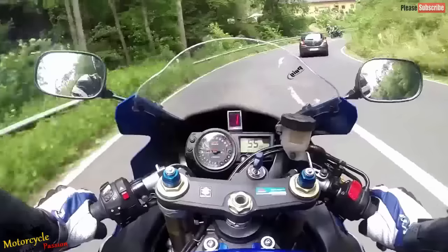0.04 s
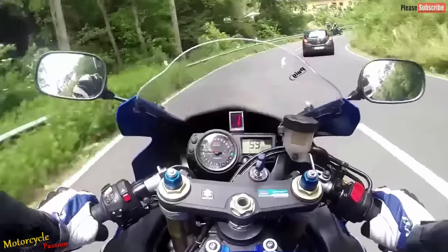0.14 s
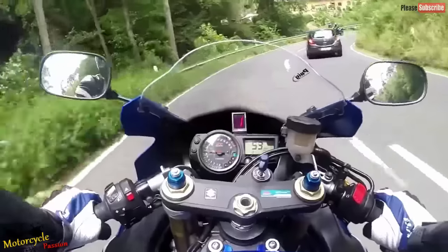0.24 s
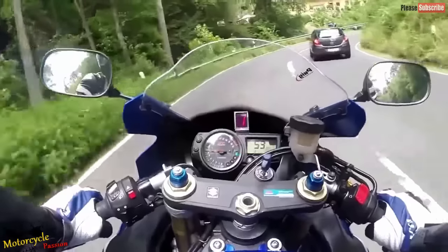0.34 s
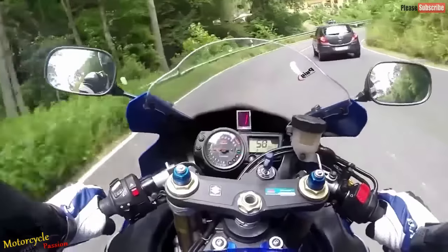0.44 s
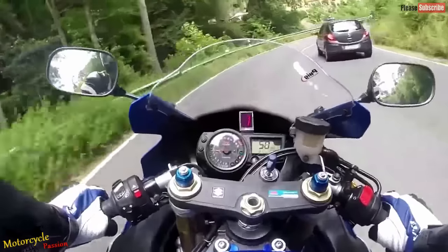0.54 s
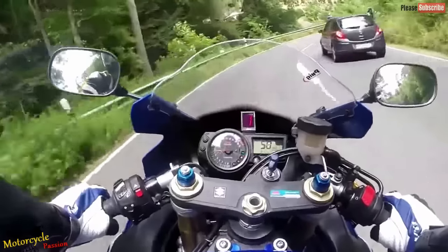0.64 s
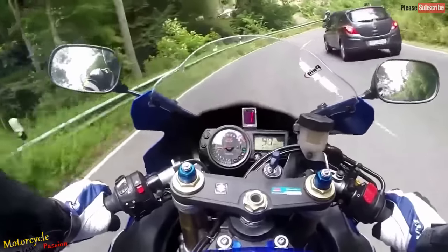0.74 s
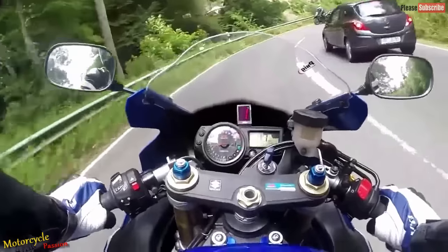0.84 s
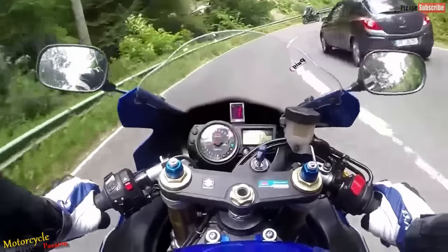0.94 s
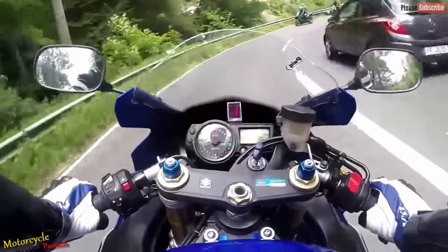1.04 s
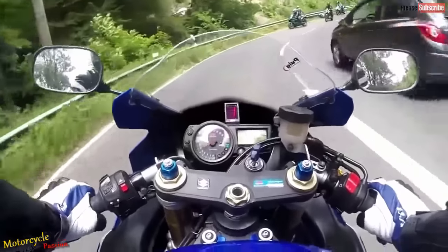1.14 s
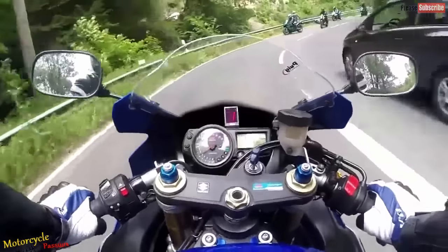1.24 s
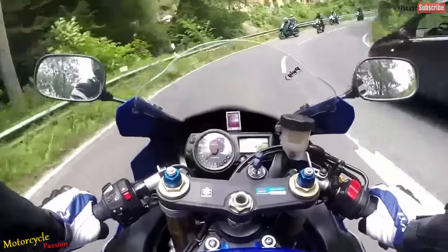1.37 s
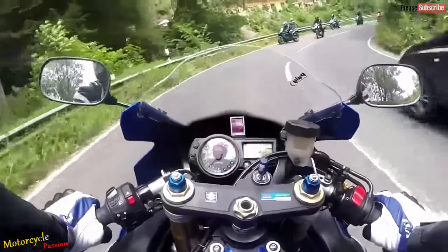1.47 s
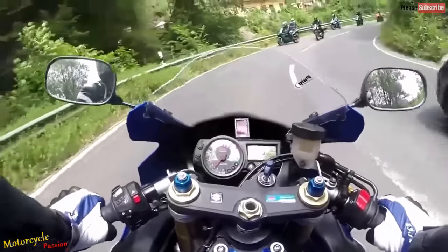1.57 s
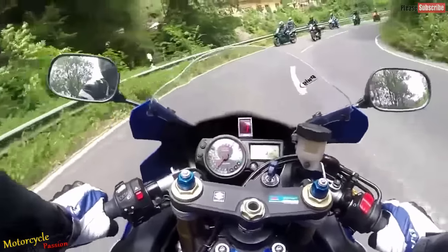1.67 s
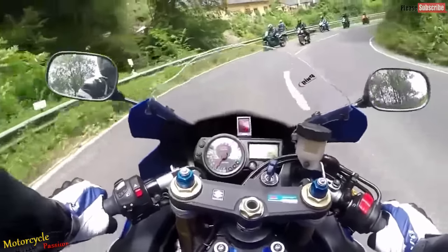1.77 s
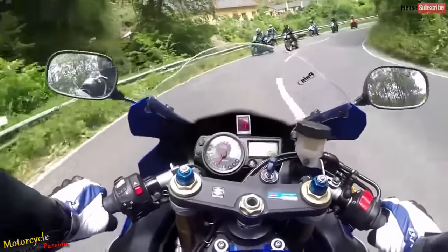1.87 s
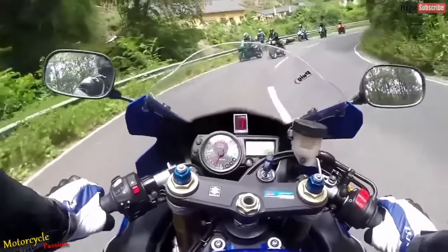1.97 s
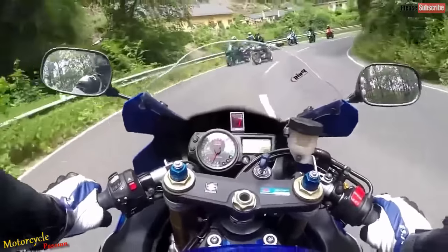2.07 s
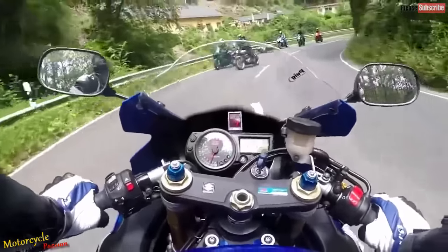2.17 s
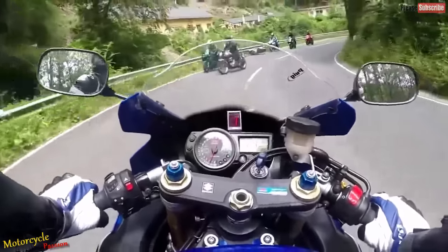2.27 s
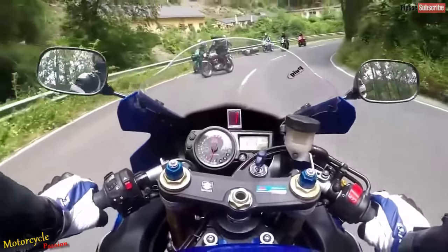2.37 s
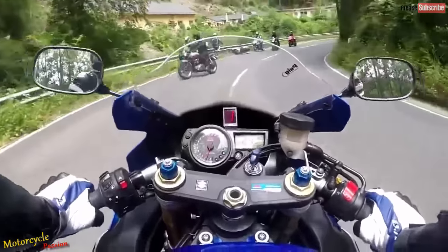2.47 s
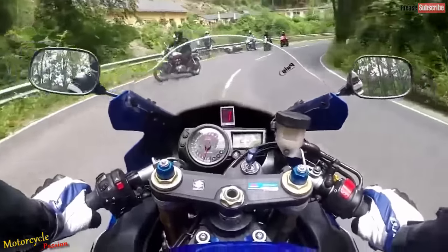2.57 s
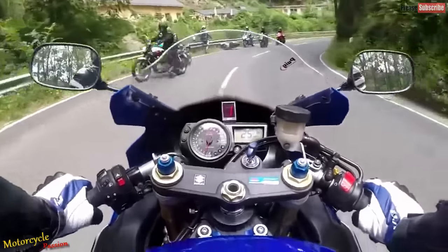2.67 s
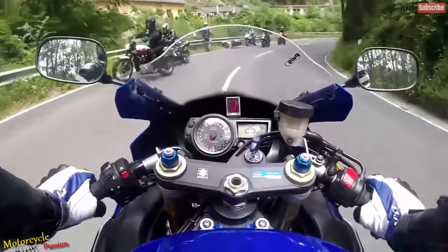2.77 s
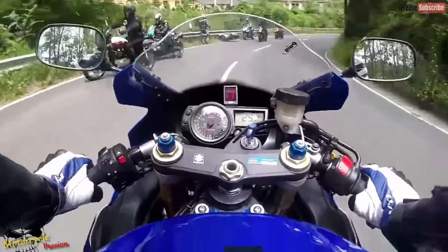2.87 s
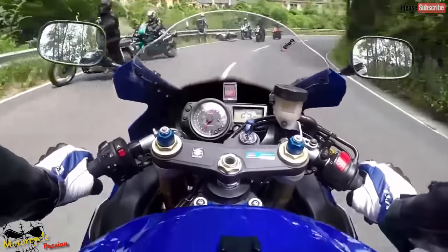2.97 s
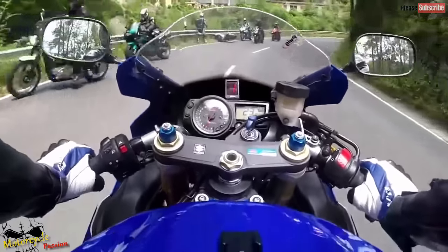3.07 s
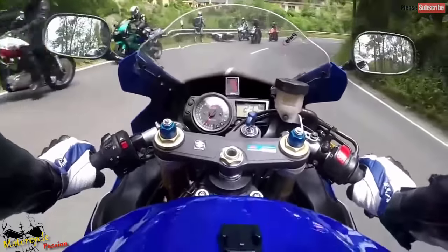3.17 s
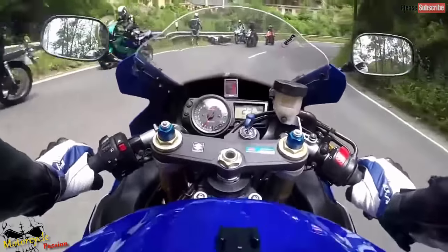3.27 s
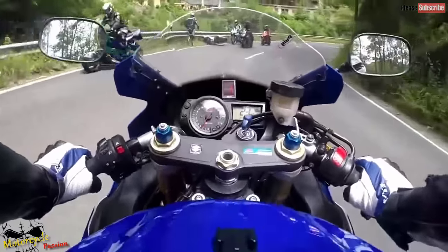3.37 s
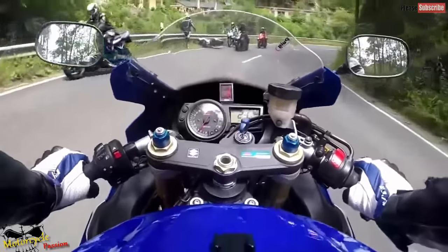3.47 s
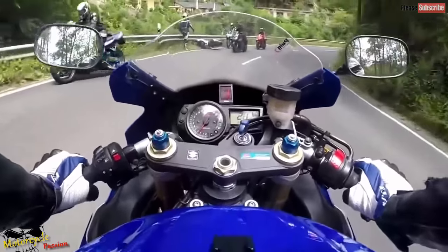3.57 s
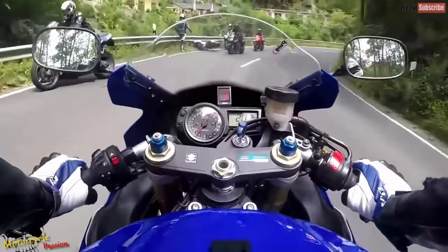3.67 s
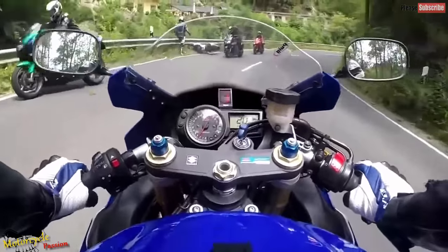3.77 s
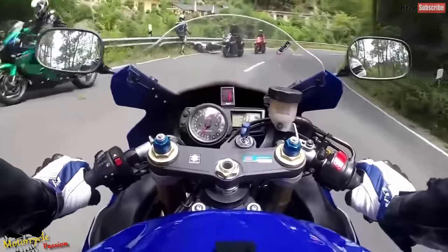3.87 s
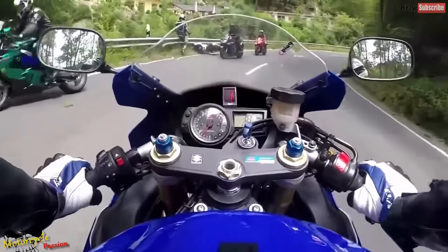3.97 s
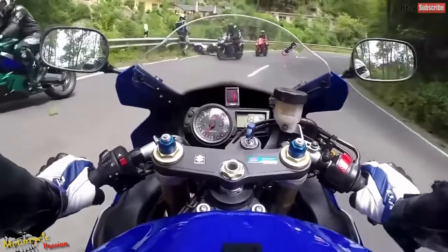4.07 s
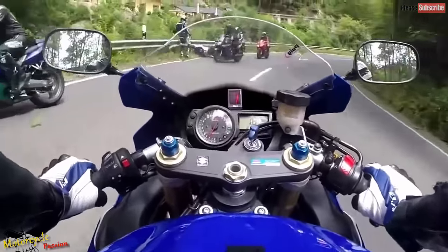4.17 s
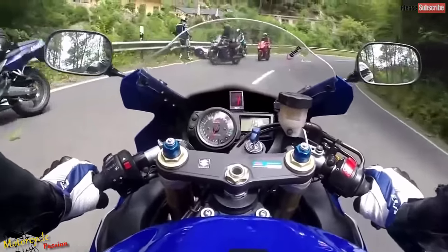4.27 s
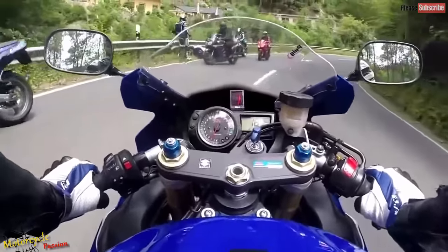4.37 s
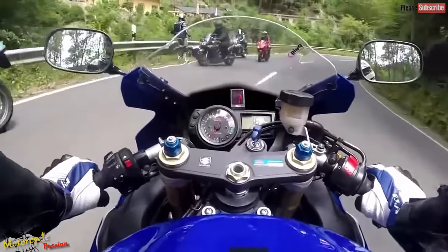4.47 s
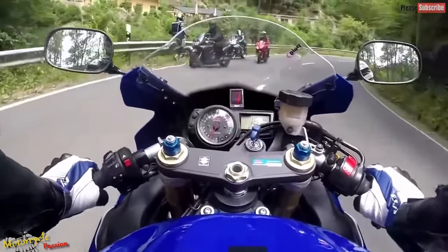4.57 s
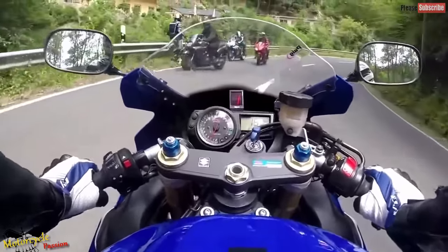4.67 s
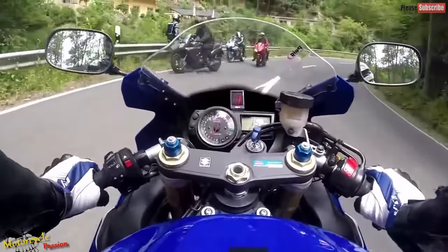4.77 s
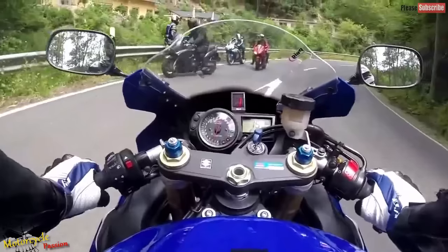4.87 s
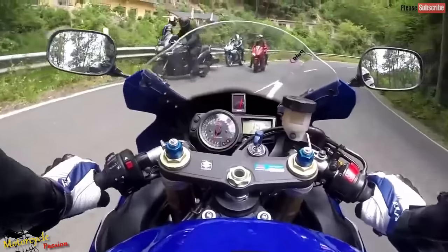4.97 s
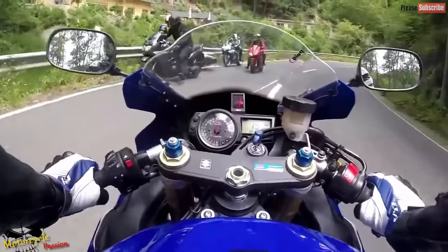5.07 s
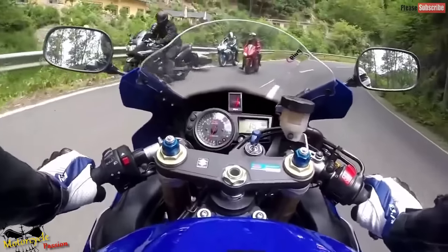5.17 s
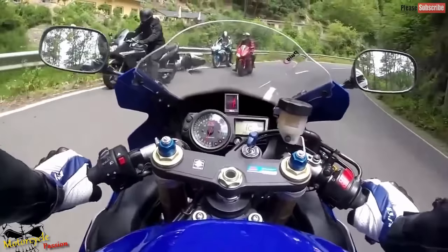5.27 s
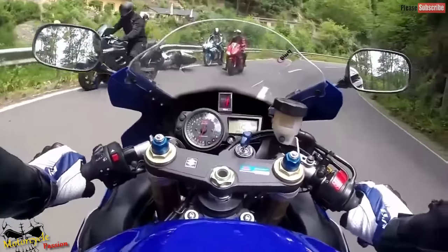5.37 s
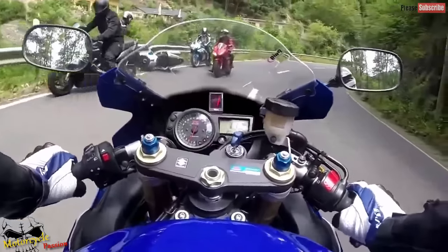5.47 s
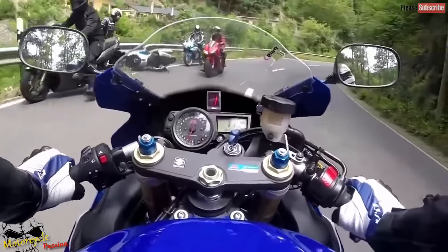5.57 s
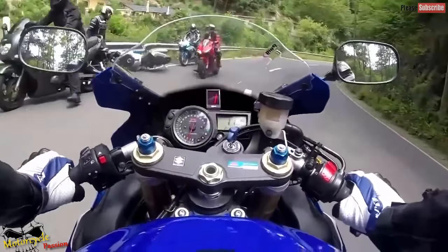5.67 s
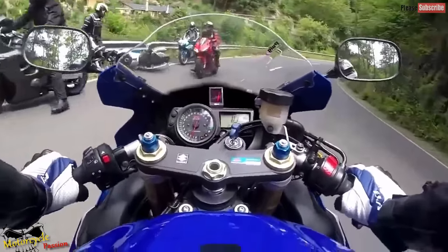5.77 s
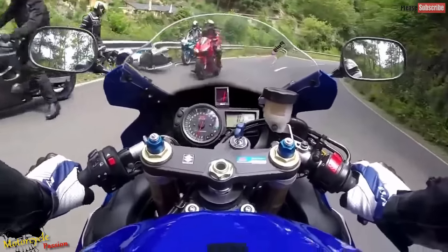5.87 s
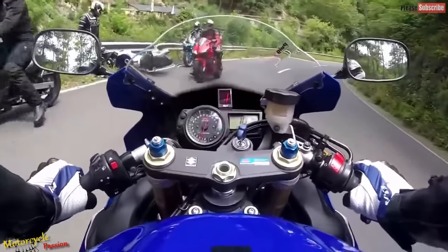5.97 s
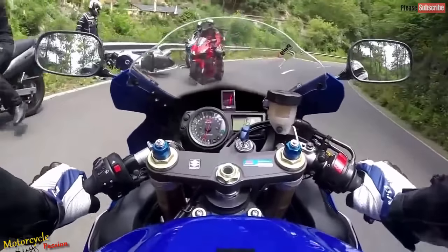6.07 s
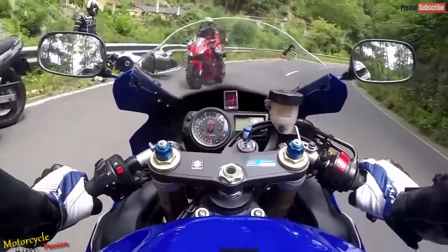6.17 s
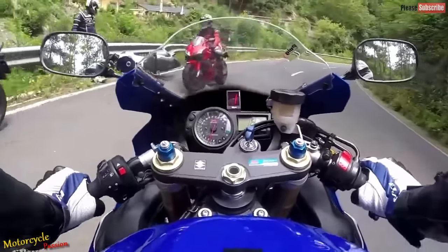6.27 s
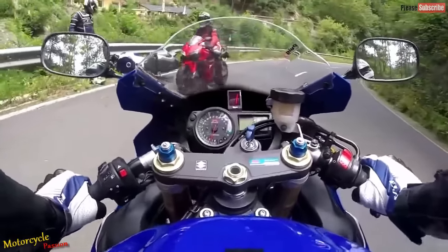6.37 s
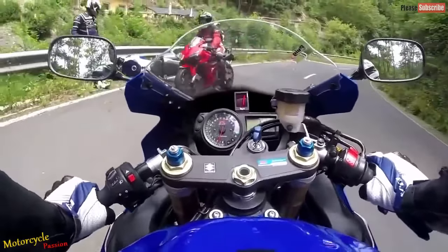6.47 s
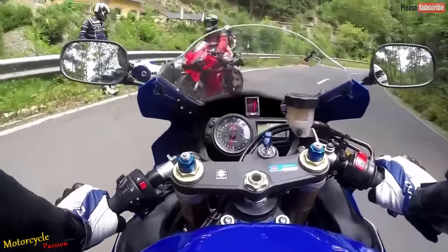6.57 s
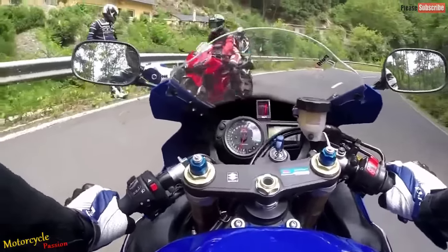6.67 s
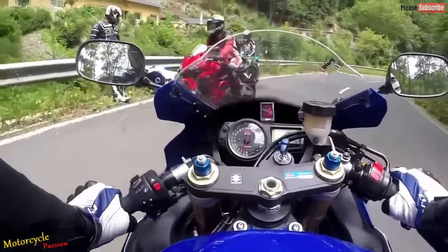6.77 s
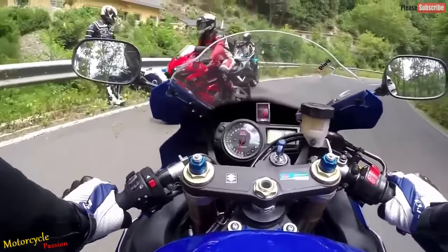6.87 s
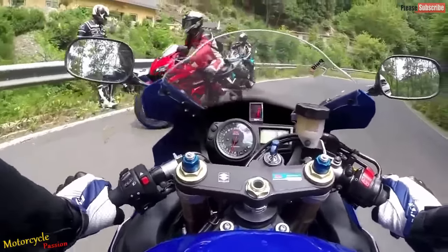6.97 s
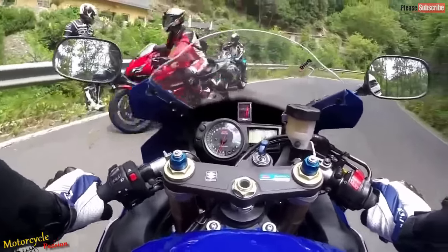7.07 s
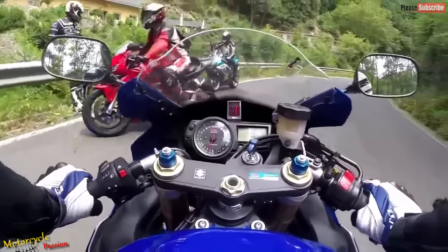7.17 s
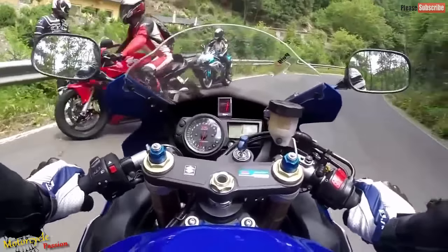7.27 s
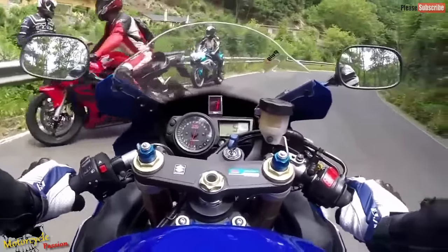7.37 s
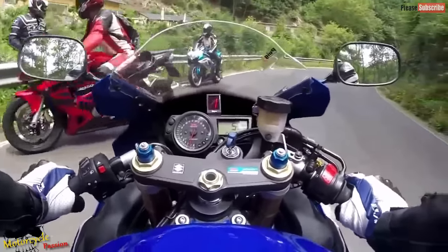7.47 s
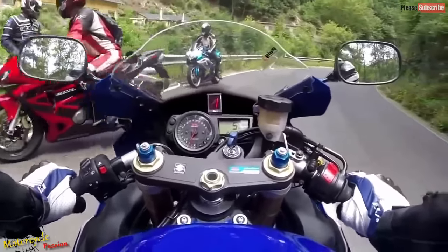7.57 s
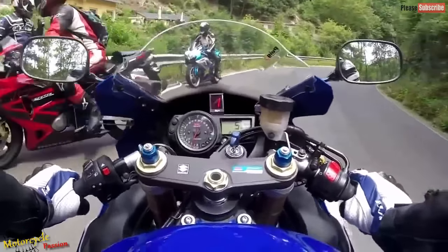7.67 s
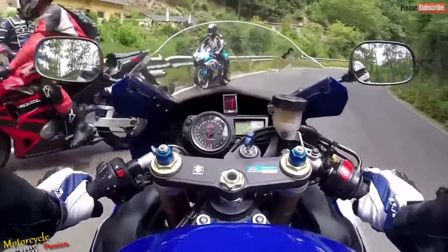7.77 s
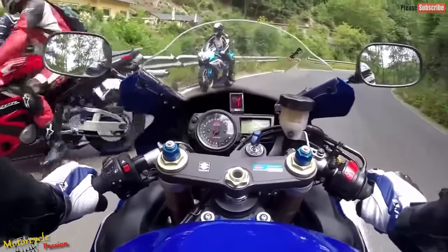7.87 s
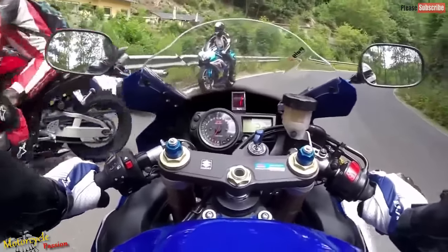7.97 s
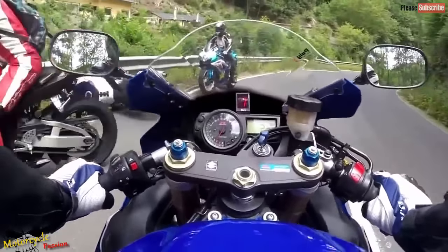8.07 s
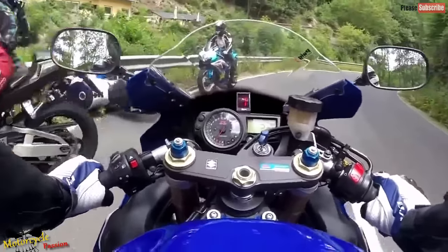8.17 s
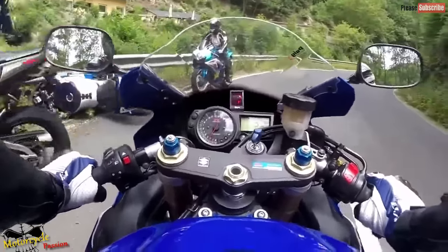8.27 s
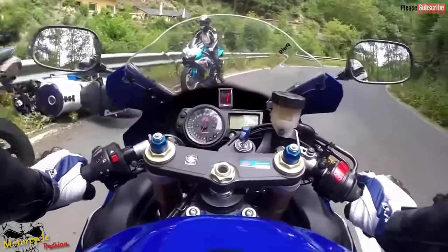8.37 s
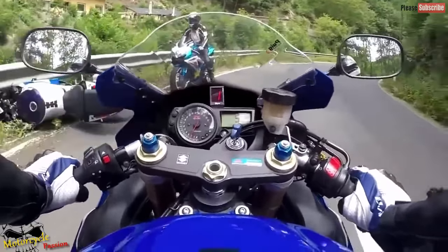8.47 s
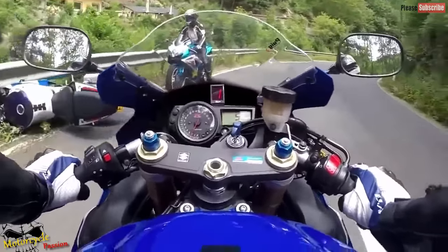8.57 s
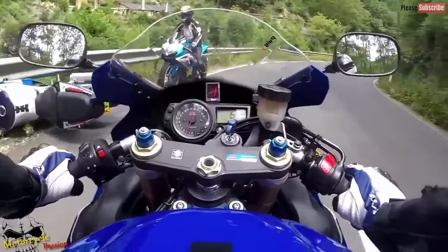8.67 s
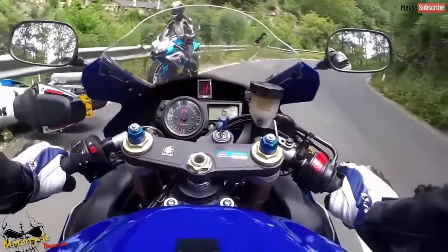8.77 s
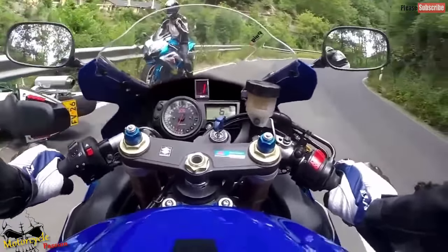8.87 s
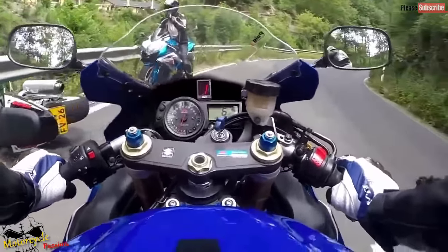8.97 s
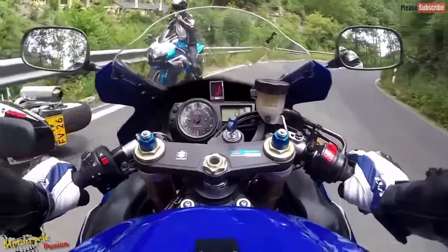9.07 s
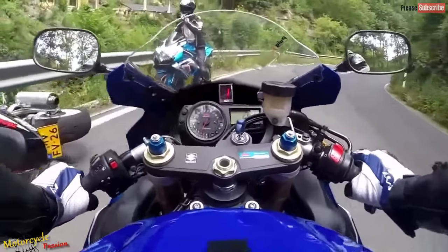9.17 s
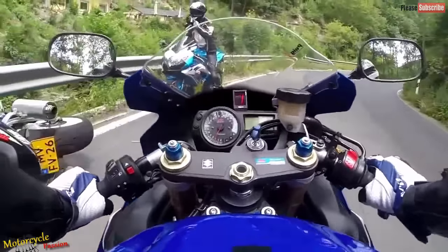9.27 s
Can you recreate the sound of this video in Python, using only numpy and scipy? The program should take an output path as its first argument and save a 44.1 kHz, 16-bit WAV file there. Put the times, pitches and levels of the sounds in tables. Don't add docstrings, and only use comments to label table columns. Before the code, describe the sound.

A motorcycle slows on an open road, its engine drone and high drivetrain whine sliding down while wind buffeting eases. At low speed a muffled hiss and uneven purr remain. The close, boxy onboard microphone picks up plastic ticks, mount thuds and latch snaps, densest in the middle and in a chattering jolt before seven seconds. The engine then revs lightly, dips and rises again.

```python
import sys
import numpy as np
from scipy import signal
from scipy.fft import rfft, irfft, next_fast_len
from scipy.io import wavfile
from scipy.ndimage import uniform_filter1d

SR = 44100
rng = np.random.default_rng(int(sys.argv[2]) if len(sys.argv) > 2 else 0)


def attenuation_scalar(level_db):
    decades = np.asarray(level_db, float) / 20
    return 10 ** decades


def dump(signal):
    limited = np.clip(np.atleast_2d(signal).T, -1, 1)
    pcm = np.round(limited * 32767).astype(np.int16)
    wavfile.write(sys.argv[1], SR, pcm)


N = 411585


def unit(x):
    return x / np.sqrt(np.mean(x ** 2) + 1e-20)


def along(points, hz):
    f, v = np.transpose(points)
    return np.interp(np.log(hz + 1), np.log(f + 1), v)


def curves(rows):
    s, *columns = np.transpose(rows)
    return [np.interp(np.arange(N) / SR, s, column) for column in columns]


def wobble(rate_hz):
    knots = rng.standard_normal(int(N * rate_hz / SR) + 4)
    return np.interp(np.arange(N) * (rate_hz / SR), np.arange(len(knots)), knots)


def coloured(x, gain):
    m = next_fast_len(N + 8192)
    return unit(irfft(rfft(x, m) * gain(np.fft.rfftfreq(m, 1 / SR)), m)[:N])


def patchy(patchy_db):
    z = signal.stft(rng.standard_normal(N), nperseg=512)[2]
    across_hz = uniform_filter1d(rng.standard_normal(z.shape), 5, 0)
    field = uniform_filter1d(across_hz, 8, 1)
    return signal.istft(z * attenuation_scalar(patchy_db * unit(field)), nperseg=512)[1][:N]


def add(track, start_s, sound):
    track[round(start_s * SR):][:len(sound)] += sound


def order_tone(turns, level_db, shake, flutter_db):
    strength = np.sqrt(2) * attenuation_scalar(level_db + flutter_db * wobble(14))
    return strength * np.sin(2 * np.pi * turns + shake * wobble(18))


def pace(hz, idle_hz, span_hz):
    return np.clip((hz - idle_hz) / span_hz, 0, 1)


# pitch_hz, level_db (rms), glide_share_per_s
FIRST_LINES = [(30.5, -27.5, -0.098), (56, -46, -0.037), (138.7, -25.5, -0.23), (285.4, -31.5, -0.36),
               (449, -45, -0.3)]
# pitch_hz, density_db
FIRST_ROAR = [(10, -6), (40, 0), (150, -15), (330, -21.5), (750, -21), (1400, -25.5), (2250, -23),
              (2400, -34), (3050, -38), (3280, -50), (3700, -43), (4060, -64), (4500, -53), (5140, -53),
              (7800, -68), (8100, -88), (8600, -71), (14000, -92)]


def first_ride():
    t = np.arange(N) / SR
    lines = 0
    for hz, db, glide in FIRST_LINES:
        turns = hz * (t + glide * t ** 2 / 2) + rng.random()
        lines += order_tone(turns, db, shake=0.25, flutter_db=0.4)
    lumps = attenuation_scalar(2.7 * wobble(46))
    roar = coloured(lumps * patchy(patchy_db=2.0), lambda f: attenuation_scalar(along(FIRST_ROAR, f)))
    return lines + attenuation_scalar(-23) * roar


# time_s, firing_rate_hz, throttle_load_db, gear_tooth_load_db
RIDE = [(0.18, 214.8, -1.5, 0), (1.0, 184.5, -0.5, -6), (1.14, 171.5, -5.5, 0), (1.57, 106.7, -6, -13),
        (2.3, 44.33, -7.5, -20), (2.77, 47.95, -6, -9), (3.2, 90, -7.5, -3), (3.42, 85.33, -2.5, -13),
        (3.81, 74.64, -4, -9), (4.6, 56.96, -10, -18), (5.7, 45.86, -4, -22), (7.27, 46.27, -9, -18),
        (7.71, 69.56, -0.5, -7), (7.89, 72.87, 0.5, -4.5), (8.1, 70.85, -1, -7.5), (8.46, 74.33, 0, -6.5),
        (8.94, 57.42, -5, -10), (9.33, 74.9, 2, -8)]


def crank():
    hz, load_db, teeth_db = curves(RIDE)
    return uniform_filter1d(hz, size=SR // 25), load_db, teeth_db


# firing_rate_hz, level_db
FIRST_ORDER = [(45, -46), (60, -36.5), (73, -37.5), (110, -42), (172, -34), (186, -32), (197, -35),
               (203, -39.5), (214, -35)]
# firing_rate_hz, level_db
SECOND_ORDER = [(46, -44.5), (58, -38.5), (73, -50.5), (110, -49), (172, -36.5), (188, -36), (203, -39),
                (208, -55)]
# firing_multiple, idle_level_db, fast_level_db
UPPER_ORDERS = [(.5, -19, -6), (1.5, -5.5, -26), (2.5, -25, -7), (3, -13.5, 3.5), (3.5, -20, -3),
                (4, 0, -6), (4.5, -20, -1), (5, -1.5, -3), (5.5, -11, -5), (6, -3, -9), (6.5, -30, -8),
                (7, -18, -12), (7.5, -28, 2), (8, -11, 5), (8.5, -17, 4), (9, -20, -5), (9.5, -35, 6),
                (10, -35, 2), (10.5, -33, -1)]


def firing_orders(hz, load_db):
    turns = np.cumsum(hz) / SR
    fast = pace(hz, idle_hz=82.0, span_hz=90)
    hunt_db = 0.5 * np.clip(-load_db / 6, 0, 1)
    clutch_s, clutch_width_s = 1.03, 0.047
    clutch_db = -16 * np.exp(-((np.arange(N) / SR - clutch_s) / clutch_width_s) ** 2)
    first_db = along(FIRST_ORDER, hz) + load_db + clutch_db + 0.45 * hunt_db * wobble(7)
    second_db = along(SECOND_ORDER, hz) + load_db + 0.22 * clutch_db + hunt_db * wobble(7)
    dip_db = 5 * np.exp(-((hz - 86) / 7) ** 2)
    upper_db = -51 - dip_db + 1.5 * load_db + hunt_db * wobble(7)
    tones = order_tone(turns, first_db - 0.7, shake=0.2, flutter_db=1.0)
    tones += order_tone(2 * turns, second_db - 0.5, shake=0.2, flutter_db=1.9)
    for multiple, idle_db, fast_db in UPPER_ORDERS:
        level_db = upper_db + idle_db + fast * (fast_db - idle_db)
        tones += order_tone(multiple * turns + rng.random(), level_db, shake=0.092, flutter_db=1.5)
    return tones


# firing_rate_hz, level_db
PUMP = [(150, -82), (172, -51), (190, -45.5), (214, -52)]


def pump(hz):
    return order_tone(3.61 * np.cumsum(hz) / SR, along(PUMP, hz), shake=0.15, flutter_db=2.0)


# firing_rate_hz, level_db
WHINE = [(45, -60), (73, -50), (95, -45.5), (140, -67)]
# time_s, level_db
TEETH_BITE = [
    (7.9, -3),
    (7.95, 3),
    (8.5, 3),
    (8.56, 0),
    (8.76, 4),
    (8.82, -30),
]
# start_s, hold_s, level_db
OVERRUNS = [
    (2.97, 0.2, -51),
    (3.2, 0.33, -54.5),
    (3.66, .11, -50),
    (3.9, .2, -56),
]


def gear_whine(hz, teeth_db):
    turns = np.cumsum(hz) / SR
    fast = pace(hz, idle_hz=82.0, span_hz=90)
    mesh = 20.5
    shut_out_db = 8 * np.clip((mesh * hz - 1450) / 450, -1, 0)
    whine_db = along(WHINE, hz) + teeth_db + shut_out_db + curves(TEETH_BITE)[0]
    attack_s, release_s, off_db = 0.15, 0.19, -66
    swells = []
    for s, hold_s, db in OVERRUNS:
        corners_s = s + np.cumsum([0, attack_s, hold_s, release_s])
        swells.append(np.interp(np.arange(N) / SR, corners_s, [off_db, db, db, off_db]))
    overtone_db = np.max(swells, axis=0) + 1.5 + 1.5 * wobble(45)
    lash = 0.009 * wobble(120)
    rough_turns = turns + lash * (0.3 + 0.65 * fast) + 0.014 * wobble(14)
    whine = order_tone(mesh * rough_turns, whine_db + 4, shake=0.4, flutter_db=1.2)
    return whine + order_tone(2 * mesh * (turns + 0.75 * lash), overtone_db, shake=1.1, flutter_db=1.2)


# time_s, pitch_hz, level_db
DRIVE = [
    (.18, 4290, -43),
    (.7, 4150, -43),
    (1.08, 3770, -45),
    (1.3, 3290, -46),
    (1.5, 2880, -47),
    (1.62, 2750, -52),
    (1.75, 2650, -75),
]


def final_drive():
    hz, level_db = curves(DRIVE)
    turns = np.cumsum(hz) / SR + 0.22 * wobble(150)
    return order_tone(turns, level_db - 2 + 1.8 * wobble(30), shake=0.8, flutter_db=1.3)


def valve_taps(hz):
    cycle = np.cumsum(hz) / SR / 4
    place, size = rng.random(10) / 2, rng.standard_normal(10)
    place = np.append(place, place + 0.5)
    size = np.append(size, size + 0.55 * rng.standard_normal(10))
    at = np.interp(np.arange(int(cycle[-1]))[:, None] + place, cycle, np.arange(N))
    size = size * attenuation_scalar(rng.standard_normal(at.shape)) / np.sqrt(hz[at.astype(int)])
    return unit(np.bincount(np.round(at).astype(int).ravel(), size.ravel(), N))


# pitch_hz, width_hz, level_db
CAVITY = [(2010, 38, -6), (2500, 80, -6.5), (2967, 42, -1), (3820, 25, 0.5), (4836, 46, 0.5),
          (5544, 130, 2.5), (5770, 36, 1), (6620, 83, -1.5), (8300, 83, -23)]
# pitch_hz, density_db
SLOW_HISS = [(590, -13.5), (1000, -17.5), (1290, -8), (1990, 0.5), (2150, -3), (2470, -3.5), (3480, -8),
             (3810, -7.5), (5130, -14), (5620, -14), (6680, -16.5), (8390, -29), (14500, -38.5),
             (15400, -43)]
# pitch_hz, density_db
FAST_HISS = [(590, -13), (1000, -16.5), (1320, -11.5), (1650, -3.5), (1920, -3.5), (2710, -4), (4230, -7.5),
             (5190, -14.5), (5620, -12.5), (6600, -13.5), (8300, -27.5), (10300, -28.5), (13600, -39.5),
             (15400, -44)]
# firing_rate_hz, level_db
HISS = [(45, -45.5), (100, -39), (210, -27)]


def valve_hiss(hz, load_db, rattle_db):
    def cavity(f):
        return 1 + sum(attenuation_scalar(db) / (1 + (2 * (f - mode_hz) / width_hz) ** 2) for mode_hz, width_hz, db in CAVITY)

    share = pace(hz, idle_hz=68.2, span_hz=49)
    beat = 1 + 0.11 * np.cos(2 * np.pi * np.cumsum(hz) / SR)
    slow = coloured(patchy(patchy_db=1.1) * beat, lambda f: attenuation_scalar(along(SLOW_HISS, f)) * cavity(f))
    fast_source = patchy(patchy_db=0.9) + 1.15 * valve_taps(hz)
    fast = coloured(fast_source, lambda f: attenuation_scalar(along(FAST_HISS, f)) * cavity(f))
    level_db = along(HISS, hz) + 0.017 * load_db + rattle_db
    return attenuation_scalar(level_db) * (np.sqrt(1 - share) * slow + np.sqrt(share) * fast)


# time_s, level_db
WIND = [(.18, 7.5), (.5, 0.5), (.97, 5), (1.15, 1), (1.4, 2.5), (2.0, 3), (2.7, -0.5), (3.5, 5), (3.9, 0),
        (4.2, 4), (4.8, 1), (5.6, 1.5), (6.1, -1.5), (6.6, 0), (7.25, 5), (7.55, -0.5), (8.7, -2), (9.2, 1)]
# pitch_hz, density_db
DRONE = [(120, -19), (200, 0), (330, 0.5), (420, -3), (520, -7.5), (700, -11.5), (900, -7.5), (1400, -18.5),
         (1900, -27), (3000, -120)]
# firing_rate_hz, level_db
DRONE_LEVEL = [(45, -54.5), (90, -50.5), (190, -44.5), (214, -51)]
# pitch_hz, density_db
BUFFET = [(5.9, -29), (10, 6.5), (103, 1.5), (156, -4.5), (300, -20), (390, -27.5), (660, -120)]
# firing_rate_hz, level_db
GUSTS = [(45, -38.5), (90, -37.5), (200, -35.5)]


def drone_and_buffeting(hz, rattle_db):
    wind_db = curves(WIND)[0]
    drone_db = along(DRONE_LEVEL, hz) + 0.56 * wind_db + 0.54 * rattle_db + 2.1 * wobble(25)
    drone = coloured(patchy(patchy_db=1.5), lambda f: attenuation_scalar(along(DRONE, f)))
    rumble = coloured(rng.standard_normal(N), lambda f: attenuation_scalar(along(BUFFET, f)))
    buffet = unit(attenuation_scalar(2.6 * wobble(12)) * rumble)
    return attenuation_scalar(drone_db) * drone + attenuation_scalar(along(GUSTS, hz) + wind_db - 4.5) * buffet


# start_s, peak_db
DOOR = [(1.3424, -44), (2.738, -37), (3.3765, -30), (3.8954, -35), (5.22, -39), (6.8138, -33),
        (6.9562, -24.5), (6.976, -37), (7.0053, -31), (7.0258, -31), (7.0355, -34), (7.9177, -32),
        (8.8887, -46), (8.9418, -46)]
STRIKE_T = np.arange(SR // 25) / SR
STRIKE_ONSET = (1 - np.exp(-STRIKE_T / 0.00034)) ** 2


def door_ring():
    return attenuation_scalar(-60 * STRIKE_T / 0.019) * np.sin(2 * np.pi * 1300 * STRIKE_T) * STRIKE_ONSET


def door_slaps(track):
    for s, db in DOOR:
        add(track, s, attenuation_scalar(db + 1.5) * door_ring())


def thuds(track, hits):
    t = np.arange(SR // 6) / SR
    for s, db, hz in hits:
        swing = np.cos(2 * np.pi * hz * t)
        swing += 0.35 * np.cos(2 * np.pi * 1.51 * hz * t) * attenuation_scalar(-60 * t / 0.046)
        decay = attenuation_scalar(db + 4.5 - 60 * t / 0.075)
        add(track, s, -decay * swing * (1 - np.exp(-t / 0.0017)))


def contact_noise(taps, step_rad, level_db, t60_s):
    band = np.hanning(taps) * np.cos(np.arange(taps) * step_rad)
    noise = np.convolve(rng.standard_normal(len(STRIKE_T)), band, "same")
    return noise * attenuation_scalar(level_db - 60 * STRIKE_T / t60_s)


# pitch_ratio, level_db, t60_s
SHELL = [(1.014, 6, 0.0098), (1.115, -6, 0.017), (0.728, -13.5, 0.017), (1.263, -4.5, 0.0041),
         (1.7, -22.5, 0.0092)]


def ticks(track, hits):
    t = STRIKE_T
    for s, db, hz, knock_db in hits:
        tick = contact_noise(15, 0.67, -22.5, 0.0087) + contact_noise(35, 0.36, -17.5, 0.016)
        for ratio, mode_db, t60_s in SHELL:
            tick += attenuation_scalar(mode_db + rng.normal(0, 2.3) - 60 * t / t60_s) * np.sin(2 * np.pi * hz * ratio * t)
        tick *= STRIKE_ONSET
        knock = sum(np.sin(2 * np.pi * body_hz * attenuation_scalar(rng.normal(0, 2.0)) * t) for body_hz in (175, 310, 560))
        knock *= attenuation_scalar(knock_db - 60 * t / 0.028) * STRIKE_ONSET
        add(track, s, attenuation_scalar(db - 2.0) * tick / abs(tick).max() - knock + attenuation_scalar(-42.5) * door_ring())


# start_s, peak_db, pitch_hz
SNAPS = [(2.215, -38, 3300), (3.3148, -37, 5800), (4.2757, -38, 4400), (5.2207, -33, 6080),
         (6.677, -27, 4550), (6.678, -37, 6900), (6.696, -42, 6000), (6.7401, -41, 6500),
         (6.7874, -46, 7000), (6.9556, -30, 4230), (6.9566, -25, 3000), (6.9566, -51, 11500),
         (7.0708, -37, 5600), (7.9207, -35, 5000), (8.942, -31, 4460)]


def latch_snaps(track):
    for s, db, hz in SNAPS:
        stray = 0.13 * np.cumsum(rng.standard_normal(len(STRIKE_T)))
        snap = attenuation_scalar(db + 5.5 - 60 * STRIKE_T / 0.0091) * np.sin(2 * np.pi * hz * STRIKE_T + stray)
        add(track, s, snap * STRIKE_ONSET)


# start_s, tick_peak_db, thud_peak_db
SHUDDERS = [
    (2.754, -28.5, -30.5),
    (8.9, -41, -32),
]
# start_s, tick_peak_db, pitch_hz, thud_peak_db
RATTLE = [(6.689, -36, 2000, -45), (6.6928, -34, 2190, -41), (6.6947, -28, 2614, -31.5),
          (6.6985, -35, 2300, -45), (6.711, -23, 2095, -29), (6.7135, -28, 2500, -45),
          (6.7286, -24, 2500, -29.5), (6.7407, -25, 2490, -26), (6.743, -30, 2200, -45),
          (6.7534, -23, 2090, -26), (6.758, -33, 2500, -43), (6.767, -27, 2400, -27),
          (6.788, -31, 2310, -29), (6.8132, -29, 2010, -32)]


def chatter():
    centre_hz, spread_hz, gap_s, scatter_s = 2250, 420, 0.0135, 0.00246
    contacts = [(s, db, (hz - centre_hz) / spread_hz, thud_db) for s, db, hz, thud_db in RATTLE]
    for s, tick_db, thud_db in SHUDDERS:
        for k, (late, loud, detune) in enumerate(rng.standard_normal((5, 3))):
            contacts.append((s + k * gap_s + scatter_s * late, tick_db + 1.6 * loud, detune, thud_db))
    tick_hits = [(s, db, centre_hz + spread_hz * detune, thud_db - 13) for s, db, detune, thud_db in contacts]
    thud_hits = [(s, thud_db, 112.6 * attenuation_scalar(0.96 * detune)) for s, db, detune, thud_db in contacts]
    return tick_hits, thud_hits


# start_s, tick_peak_db, tick_pitch_hz, thud_peak_db, thud_pitch_hz
BUMPS = [(1.459, -32, 1800, -23.5, 128), (1.551, -20.5, 2070, -23.5, 95), (1.6249, -20, 2168, -23.5, 113),
         (1.7279, -24, 2296, -24.5, 123), (1.8331, -25, 1950, -20, 80.6), (2.215, -18.5, 2385, -38, 122),
         (2.2939, -18.5, 2070, -34, 122), (2.618, -27, 2030, -30.5, 142), (2.7368, -24.5, 2100, -23, 130),
         (3.3147, -14.5, 2420, -26.5, 114), (3.3775, -19, 2160, -28.5, 127),
         (3.4195, -27, 2000, -29, 120.6), (3.52, -23, 2400, -27.5, 110), (3.6593, -28, 1963, -26.5, 110),
         (3.7508, -22, 2020, -26, 119), (3.897, -19, 2250, -28, 105), (4.1938, -16.5, 2280, -39, 116),
         (4.2757, -25, 2346, -26.5, 80.4), (5.2205, -22.5, 2520, -25, 99), (6.6775, -10, 2200, -29, 143.8),
         (6.9564, -17, 2150, -33, 133.4), (7.3326, -26, 2171, -35, 193), (7.9192, -22.5, 1950, -27, 126),
         (8.8888, -27, 1988, -38, 128.6)]
# start_s, peak_db, pitch_hz, knock_peak_db
TICKS = [(1.3423, -25, 2000, -45), (1.636, -15, 2100, -33), (1.8644, -22.5, 2360, -34),
         (1.8906, -29, 2300, -35.5), (2.2587, -30, 2010, -45), (2.7554, -30, 2000, -41),
         (3.105, -23.5, 2150, -40), (3.211, -17.5, 2378, -36), (3.2175, -22, 2070, -34),
         (3.3906, -23, 2475, -32), (3.5578, -28, 2010, -33), (3.5827, -22.5, 2250, -33.5),
         (4.5398, -20.5, 2185, -44), (5.745, -18.5, 2000, -37.5), (6.103, -21, 2340, -46),
         (6.204, -27, 2410, -42), (6.4344, -30, 1754, -55), (6.456, -19.5, 2300, -40),
         (6.548, -22.5, 2060, -35.5), (6.976, -24, 2540, -52), (7.0058, -23, 2360, -52),
         (7.0256, -25, 2305, -53), (7.0365, -26.5, 1940, -53), (7.0718, -28, 1860, -36),
         (7.2, -27.5, 2034, -46), (7.3494, -31, 2445, -44), (7.3706, -19.5, 2233, -51),
         (8.068, -25.5, 2012, -36), (8.946, -21, 2430, -45), (8.9418, -14.5, 2250, -42),
         (9.317, -20.5, 2046, -41)]
# start_s, peak_db, pitch_hz
THUDS = [(.79, -27, 95), (9.111, -30, 66), (.975, -27, 100), (1.345, -25, 85), (3.99, -39, 75),
         (4.146, -31, 69.6), (4.63, -36, 60), (7.38, -35, 100), (2.075, -30, 97.1), (2.128, -31.5, 96),
         (5.041, -39, 85.8), (5.094, -33, 108.1), (5.823, -31, 108), (6.447, -34.5, 194), (6.894, -30, 92),
         (7.189, -33, 80.7), (7.686, -32, 112.6), (8.07, -32, 105), (9.075, -41, 128)]


def housing():
    track = np.zeros(N + SR)
    chatter_ticks, chatter_thuds = chatter()
    bump_ticks = [(s, db, hz, -35.5) for s, db, hz, _, _ in BUMPS]
    bump_thuds = [(s + 0.00063, db, hz) for s, _, _, db, hz in BUMPS]
    thuds(track, bump_thuds + THUDS + chatter_thuds)
    ticks(track, bump_ticks + TICKS + chatter_ticks)
    door_slaps(track)
    latch_snaps(track)
    return track[:N]


# time_s, level_db (rms)
INTAKE = [
    (1.4, -75),
    (1.7, -58),
    (3.0, -55),
    (3.25, -45),
    (3.8, -51),
    (4.3, -53),
    (6.9, -56.5),
    (7.5, -70),
]


def intake():
    centre_hz, width_hz = 2000, 90
    hiss = coloured(rng.standard_normal(N), lambda f: 1 / (1 + (2 * (f - centre_hz) / width_hz) ** 2))
    return attenuation_scalar(curves(INTAKE)[0] + 2.1 * wobble(20)) * hiss


# start_s, length_s, pitch_hz, level_db (rms)
HIGH_TONES = [
    (6.695, .045, 12500, -60),
    (6.74, .05, 12600, -72),
    (7.02, .028, 12600, -70),
    (4.96, .05, 14900, -72),
]


def high_tones():
    t = np.arange(N) / SR
    width_hz = 700
    stray = np.cumsum(wobble(900)) * width_hz / 3 / SR
    out = np.zeros(N)
    for s, length_s, hz, db in HIGH_TONES:
        fade = np.clip(np.minimum(t - s, s + length_s - t) / 0.003, 0, 1)
        out += np.sqrt(2) * attenuation_scalar(db) * fade * np.sin(2 * np.pi * (hz * t + stray))
    return out


# time_s, pitch_hz, level_db
SLIP = [
    (9.06, 1452, -67),
    (9.14, 1470, -55),
    (9.33, 1466, -56),
]


def slipping_gears():
    hz, level_db = curves(SLIP)
    turns = np.cumsum(hz) / SR + 0.3 * wobble(20) + 0.13 * wobble(110)
    return order_tone(turns, level_db, shake=0.5, flutter_db=2.5)


def main_ride():
    hz, load_db, teeth_db = crank()
    rattle_db = 0.11 * wobble(9) + 0.66 * wobble(40)
    engine = firing_orders(hz, load_db) + pump(hz) + gear_whine(hz, teeth_db)
    noises = valve_hiss(hz, load_db, rattle_db) + drone_and_buffeting(hz, rattle_db) + intake()
    return engine + final_drive() + noises + housing() + high_tones() + slipping_gears()


def scene():
    after = np.clip((np.arange(N) / SR - 0.189) / 0.0059 + 1, 0, 1)
    mono = (1 - after) * first_ride() + after * main_ride()
    return np.array([mono, mono])


def low_pass(x):
    return signal.sosfilt(signal.butter(12, 15540, fs=SR, output="sos"), x)


def record(dry):
    m = next_fast_len(N)
    kept = irfft(rfft(dry, m) * (np.fft.rfftfreq(m, 1 / SR) < 15140), m)[:, :N]
    return low_pass(kept)


dry = scene()
out = record(dry)
dump(out)
```